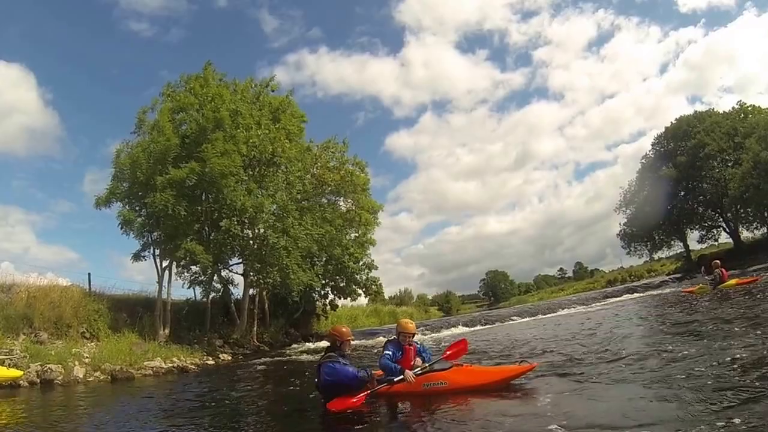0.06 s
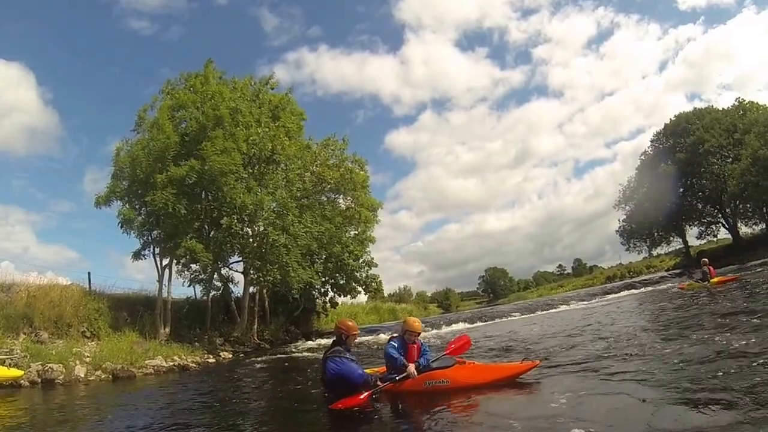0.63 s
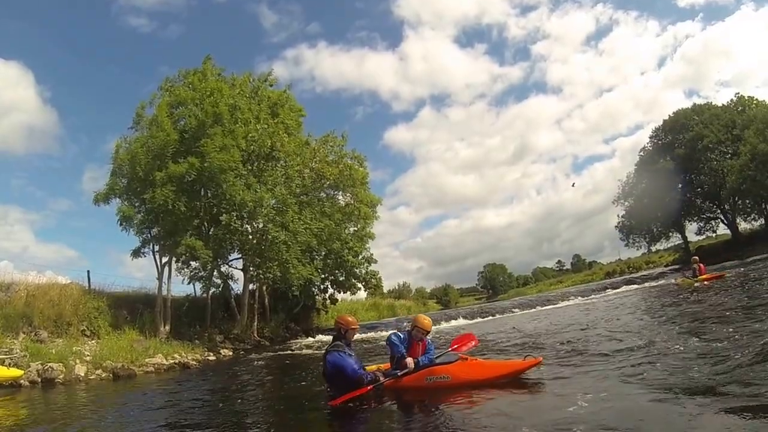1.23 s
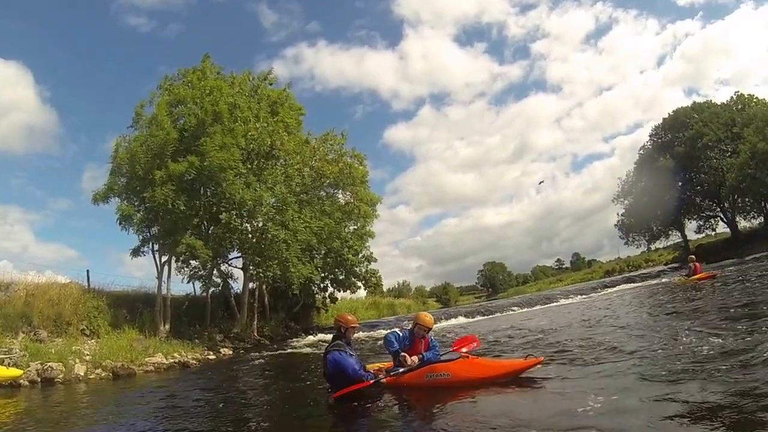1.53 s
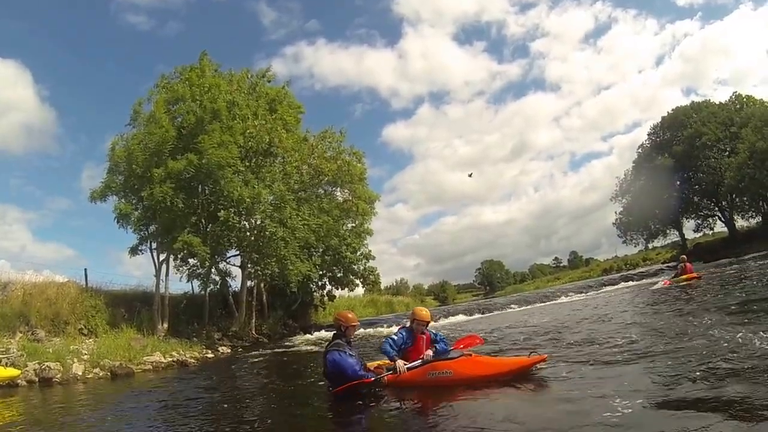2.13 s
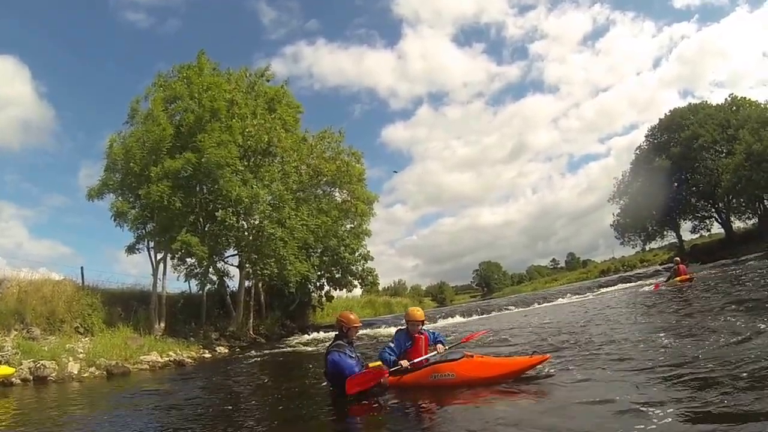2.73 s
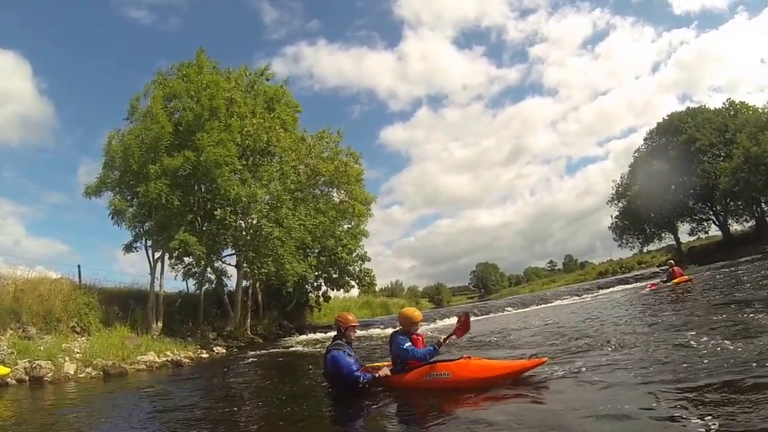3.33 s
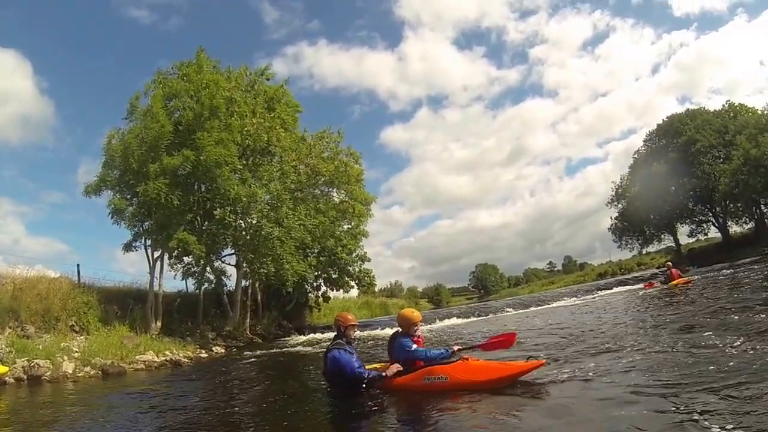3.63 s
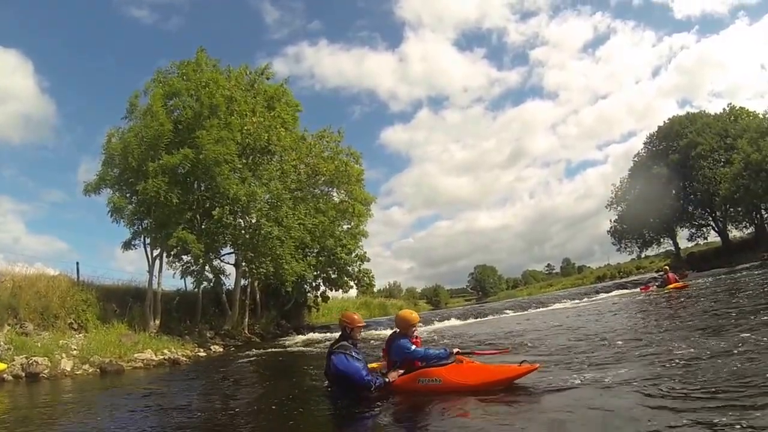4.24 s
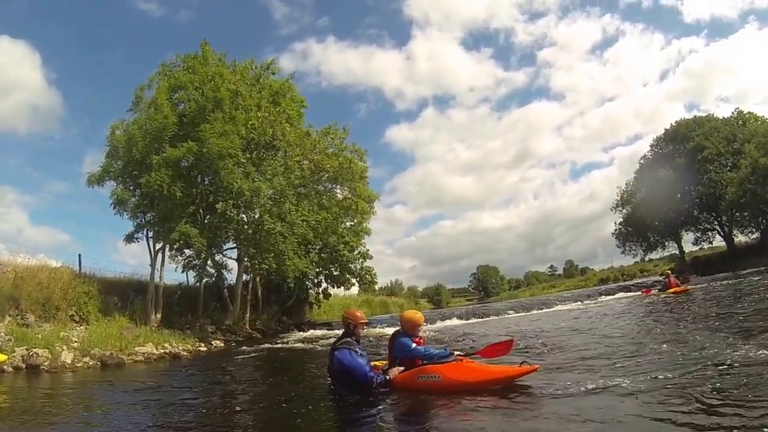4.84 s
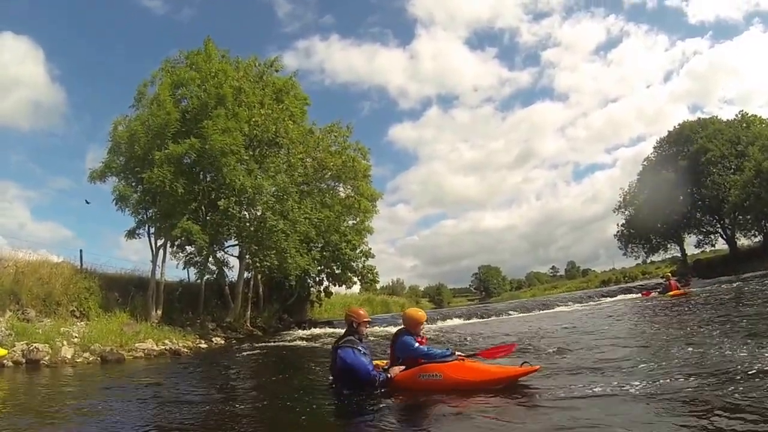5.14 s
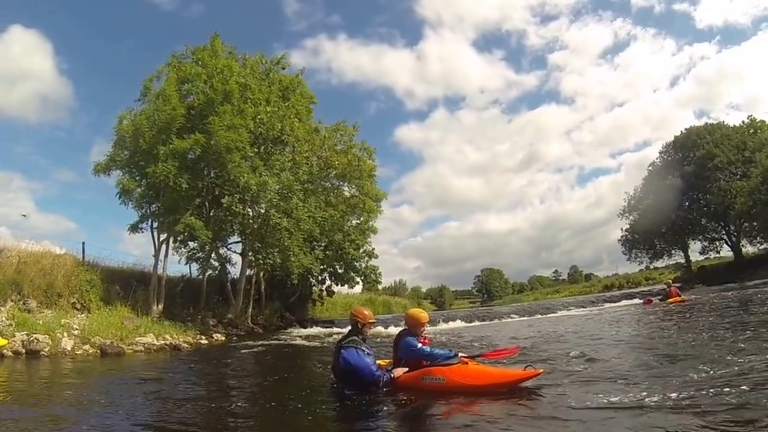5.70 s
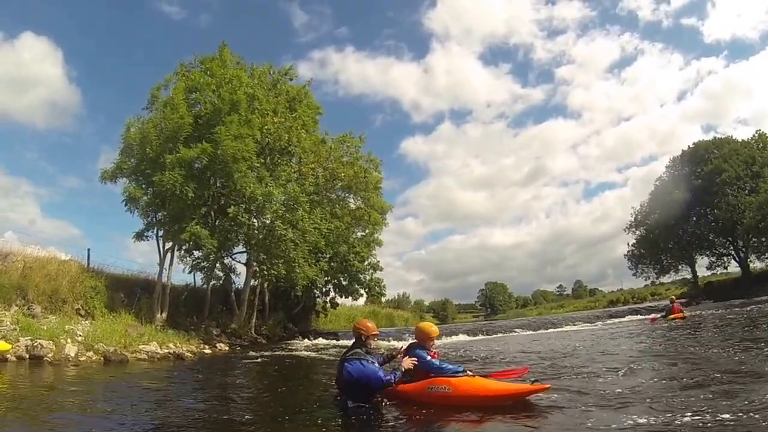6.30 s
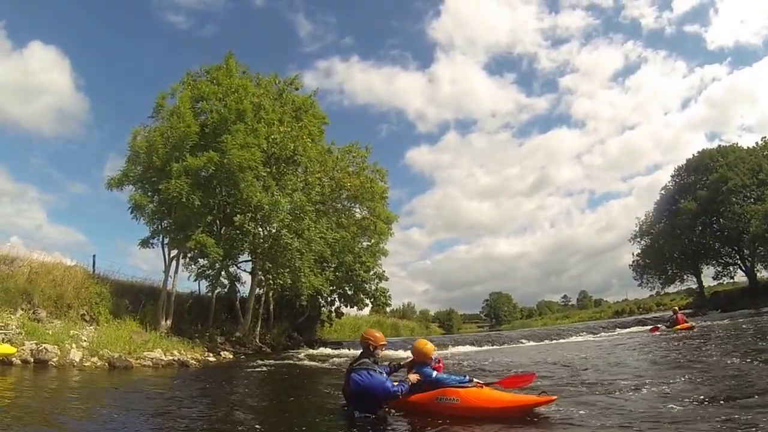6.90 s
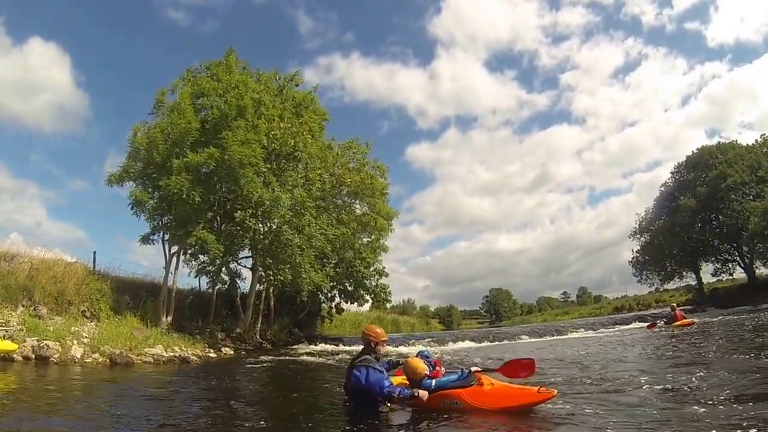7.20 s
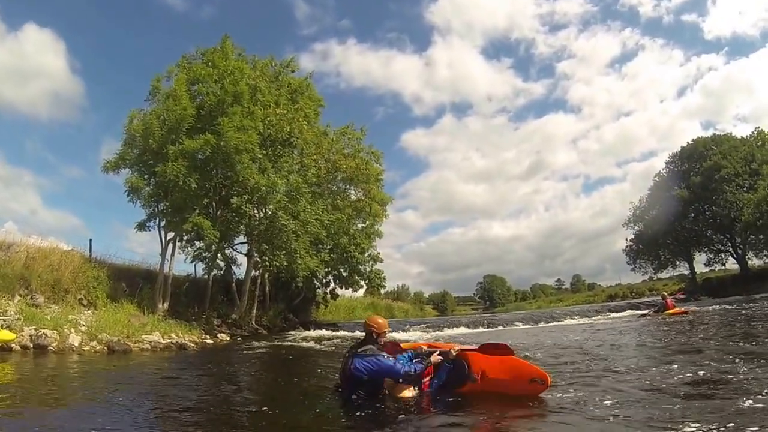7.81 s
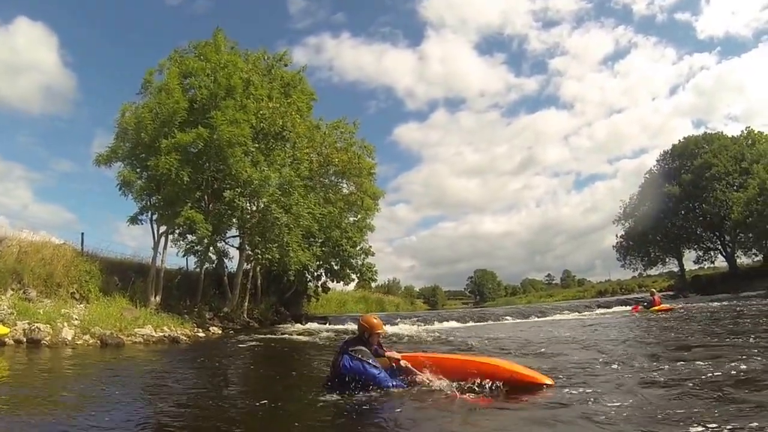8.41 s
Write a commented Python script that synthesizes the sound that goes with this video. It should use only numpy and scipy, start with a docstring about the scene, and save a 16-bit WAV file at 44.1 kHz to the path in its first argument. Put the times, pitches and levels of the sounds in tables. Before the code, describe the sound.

Rushing river water and soft hull bumps, with dripping, sloshing and gurgling near the end as a kayak capsizes close by.

```python
"""On a river, from a kayak; the microphone sits in a waterproof camera case that rings near 1.5 kHz.
From the start, water roars over a low weir some way off, the current rumbles in slow swells and bumps
against the hull, and the camera's electronics hiss and whine faintly under it all.
At about 6.4 s a second kayak close by leans, stirring up froth and dripping. It tips at 7.5 s and
rolls over just after 8 s, slapping the water as air gulps out from under it."""
import sys
import numpy as np
from scipy import signal
from scipy.fft import rfft, irfft
from scipy.io import wavfile
from scipy.ndimage import uniform_filter1d

SR = 44100
rng = np.random.default_rng(int(sys.argv[2]) if len(sys.argv) > 2 else 0)


def persist_wave(psi):
    """Save psi, clipped to +-1, as 16-bit WAV."""
    counts = np.round(np.clip(psi, -1, 1) * 32767).astype(np.int16)
    wavfile.write(sys.argv[1], SR, np.atleast_2d(counts).T)


N = 377055
T = np.arange(N) / SR

# resonances and notches of the case around the microphone (centre [Hz], width [Hz], gain [dB])
CASE = [(1484.7, 522, 26.3), (2000, 106, -7.5), (2407, 405, 8), (2610, 133, -9.5), (2812, 430, 6),
        (4807, 750, 9), (6540, 180, 4), (8200, 440, 2.5), (13100, 310, 4), (14470, 1190, 3.2)]
# spectrum of spray at close range (frequency [Hz], level [dB])
SPRAY = [(300, -22), (1500, -23), (2200, -4), (3000, 9), (4000, -7), (5000, -8), (7000, -20), (14000, -34)]


def undb(db):
    """Decibels to gain."""
    return 10 ** (np.asarray(db) / 20)


def level(x, db):
    """Scale to an rms level."""
    return x * undb(db) / np.sqrt(np.mean(x ** 2))


def walk(hz):
    """A random wander with a spread of 1 that takes a new direction hz times a second."""
    step = max(int(SR / hz), 1)
    held = np.repeat(rng.standard_normal(N // step + 2), step)[rng.integers(step):][:N]
    slewed = uniform_filter1d(held, step)
    return slewed / slewed.std()


def add(out, s, sound):
    """Mix a short sound in at time s."""
    start = max(int(s * SR), 0)
    out[start:start + len(sound)] += sound[:max(N - start, 0)]


def colour(x, points=((1, 0), (2, 0)), bells=(), size=4096):
    """Filter by a smooth spectrum (frequency [Hz], level [dB]) and by resonances laid out as in CASE."""
    f = np.maximum(np.arange(size // 2 + 1) * SR / size, 1)
    hz, db = np.transpose(points)
    smooth_db = np.interp(np.log(f), np.log(hz), db)
    bells_db = sum(gain / (1 + (2 * (f - centre) / width) ** 2) for centre, width, gain in bells)
    cepstrum = irfft(np.log(undb(smooth_db + bells_db)))
    cepstrum[1:size // 2] *= 2  # folded so that ringing only follows a sound
    cepstrum[size // 2 + 1:] = 0
    impulse = irfft(np.exp(rfft(cepstrum)))
    return signal.oaconvolve(x, impulse)[:len(x)]


def bursts(per_s, spread_db):
    """Clicks at random times, many small and a few large."""
    hits = rng.random(N) < per_s / SR
    size = np.minimum(rng.exponential(size=N), 6)
    return hits * rng.choice([-1, 1], N) * undb(spread_db * size)


def weir(start_db=-50, drift_db_per_s=0.0882):
    """Some way off, countless splashes merge into a roar that grows slightly as the kayak drifts."""
    # spectrum of the falling water (frequency [Hz], level [dB])
    roar = [(130, -1.5), (300, -2), (750, -6.5), (1000, -12), (1800, -15), (3000, -6.5), (4000, -19.5),
            (6000, -21), (9000, -27.5), (15000, -33.5)]
    wash = rng.standard_normal(N) * undb(0.13 * walk(hz=6.2))
    spatter = level(bursts(per_s=1800, spread_db=2.5), -5.5) * undb(walk(hz=14))
    return level(colour(wash + spatter, roar, CASE), start_db) * undb(drift_db_per_s * T)


def current(base_db=-50.2, weak_db=2, strong_db=4.5, first_s=0.25, period_s=1.97, width_s=0.35):
    """The current rumbles on the hull in evenly paced swells, weak and strong in turn."""
    # spectrum of the flow along the hull (frequency [Hz], level [dB])
    rumble = [(10, -20.5), (20, -4.5), (30, -4.5), (43, -3), (60, -10), (85, -19), (120, -27), (200, -38.5),
              (400, -64.5)]
    flow = level(colour(rng.standard_normal(N), rumble, size=16384), base_db)
    swell_db = np.zeros(N)
    for k, s in enumerate(np.arange(first_s, N / SR, period_s)):
        swell_db += (strong_db if k % 2 else weak_db) * np.exp(-((T - s) / width_s) ** 2)
    eddy_db = 1.9 * walk(hz=9)  # single eddies make the rumble uneven
    return flow * undb(swell_db + eddy_db)


def electronics(whine_hz=5755, throb_hz=60):
    """The camera's thin whine throbs at the picture rate; its top hiss flickers in a repeating pattern."""
    phase = 2 * np.pi * np.cumsum(whine_hz + 24 * walk(hz=200)) / SR
    throb = 1 + 0.85 * np.sin(2 * np.pi * throb_hz * T)
    whine = level(throb * np.sin(phase), -78) + level(throb * np.sin(2 * phase), -89)
    hiss = colour(rng.standard_normal(N), [(11000, -24), (12500, -14), (14000, 0)])
    flicker = np.resize(walk(hz=130)[:SR // 5], N)  # repeats every 0.2 s
    return whine + level(hiss * undb(6 * flicker / flicker.std()), -84)


def wavelets():
    """Now and then a wavelet gives the hull one soft, low push."""
    # bumps on the hull that carries the microphone (time [s], pitch [Hz], peak [dB])
    bumps = [(1.403, 41.7, -34), (2.84, 62, -41), (3.715, 41.6, -36.5), (4.31, 49.7, -39),
             (4.43, 69, -38.5), (5.401, 42.3, -34), (5.92, 36, -32.5), (6.427, 61.4, -29.5),
             (8.221, 37.3, -35)]
    out = np.zeros(N)
    for s, hz, db in bumps:
        cycles = np.arange(-int(2 * SR / hz), int(2 * SR / hz)) * hz / SR
        push = np.cos(2 * np.pi * cycles) * np.exp(-(cycles / 0.54) ** 2)
        add(out, s - 2 / hz, undb(db) * push)
    return out


def bubble(hz, t60, glide):
    """A trapped bubble rings and rises in pitch as it nears the surface."""
    t = np.arange(int(t60 * SR) + 2) / SR
    return np.sin(2 * np.pi * hz * t * (1 + glide * t / t60 / 2)) * np.exp(-np.log(1000) * t / t60)


def froth(per_s=2600, sizes=20, ring_cycles=10, surge_db=1.7):
    """Swarms of bubbles of all sizes; each size surges by itself."""
    out = np.zeros(N)
    for hz in np.geomspace(250, 12000, sizes):
        births = bursts(per_s / sizes, spread_db=2.6)
        swarm = signal.oaconvolve(births, bubble(hz, ring_cycles / hz, glide=0.11))[:N]
        out += level(swarm, 0) * np.sqrt(hz) * undb(surge_db * walk(hz=16))
    return level(out, 0)


def stirred_water(attack_s=0.095, settle_t60_s=0.87):
    """Close by, froth builds with each move of the second kayak, lasts through it and settles."""
    # the kayak leans, tips, rolls over (start [s], length [s], level [dB])
    moves = [(6.44, 0.44, -58), (7.49, 0.38, -57), (8.08, 0.41, -49.5)]
    # spectrum of sloshing at close range (frequency [Hz], level [dB])
    slosh = [(100, -12), (280, 2), (500, -10), (1000, -9.5), (1500, -1.5), (2200, 0.5), (3000, 7.5),
             (4000, -7), (5000, -5.5), (7000, -16), (10000, -17), (15000, -28)]
    envelope = np.zeros(N)
    for s, length, db in moves:
        rise = np.clip((T - s) / attack_s, 0, 1)
        settle = np.exp(-np.log(1000) * np.maximum(T - s - length, 0) / settle_t60_s)
        envelope += undb(db) * rise * settle
    fizz = froth()
    mist = level(rng.standard_normal(N), -3)  # the finest spray merges into a hiss
    return level(colour(fizz + mist, slosh, CASE), 0) * envelope


def splash(t60):
    """A short burst of spray that swells for a moment and dies away."""
    t = np.arange(SR // 4) / SR
    return rng.standard_normal(len(t)) * np.minimum(20 * t / t60, 1) * np.exp(-np.log(1000) * t / t60)


def drips(ring_cycles=68):
    """Each drop ticks on the surface; its bubble rings a set number of cycles, so small ones are brief."""
    # drops falling near the microphone (time [s], bubble pitch [Hz], peak [dB])
    drops = [(6.523, 5140, -45), (6.543, 2000, -42), (6.600, 5700, -50), (6.632, 4800, -52),
             (6.666, 1480, -38.5), (6.780, 1590, -36), (6.841, 1750, -41), (6.893, 5240, -47),
             (6.928, 1560, -39), (7.146, 2500, -40), (7.226, 6260, -52), (7.278, 2100, -41),
             (7.762, 2740, -39), (8.306, 2800, -33)]
    out = np.zeros(N)
    for s, hz, db in drops:
        ring = bubble(hz, ring_cycles / hz, glide=0.29)
        tick = colour(splash(t60=0.01), SPRAY)[:len(ring)]
        drip = colour(ring + 0.49 * tick, bells=CASE)
        add(out, s, undb(db) * drip / np.abs(drip).max())
    return out


def slaps():
    """The second kayak's paddle and hull strike the water and throw spray."""
    # strikes on the water close by (time [s], peak [dB])
    strikes = [(7.516, -48), (7.532, -40.5), (7.541, -43), (7.563, -42), (8.205, -44), (8.284, -45),
               (8.437, -43)]
    out = np.zeros(N)
    for s, db in strikes:
        slap = colour(splash(t60=0.065), SPRAY, CASE)
        add(out, s, undb(db) * slap / np.abs(slap).max())
    return out


def gulps(pinch_s=0.0022):
    """Large pockets of air pinch off gradually from under the rolling hull and ring low."""
    # escaping air pockets (time [s], pitch [Hz], level [dB])
    pockets = [(7.54, 206, -52), (7.857, 178, -47.5), (8.215, 139, -48), (8.355, 308, -48),
               (8.372, 260, -48), (8.393, 205, -46.5), (8.475, 272, -52)]
    out = np.zeros(N)
    for s, hz, db in pockets:
        ring = bubble(hz, t60=0.1, glide=0.2)
        onset = 1 - np.exp(-np.arange(len(ring)) / SR / pinch_s)
        add(out, s, undb(db) * ring * onset)
    return out


def scene():
    """The river, the second kayak and the camera's own noise at the one microphone."""
    river = weir() + current() + wavelets()
    second_kayak = stirred_water() + drips() + slaps() + gulps()
    return (river + second_kayak + electronics())[None]


def record(dry):
    """The camera cuts the treble steeply above 15.25 kHz."""
    return signal.sosfilt(signal.ellip(12, 0.1, 70, 15250, fs=SR, output="sos"), dry)


dry = scene()
out = record(dry)
persist_wave(out)
```